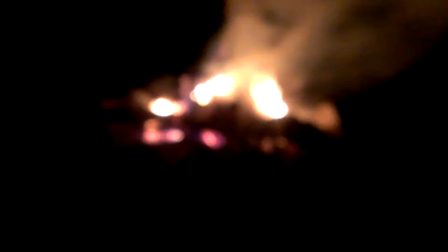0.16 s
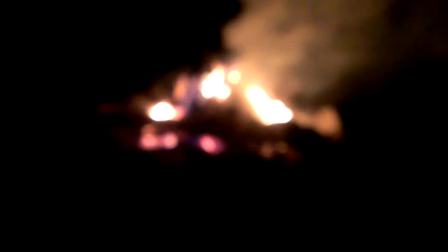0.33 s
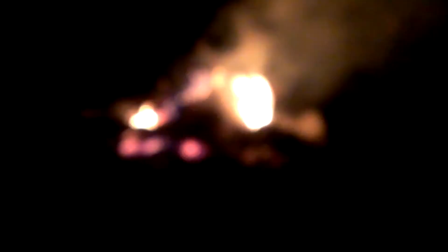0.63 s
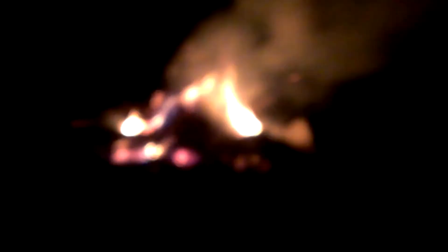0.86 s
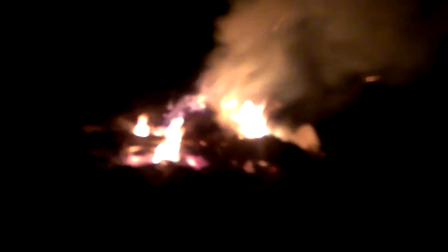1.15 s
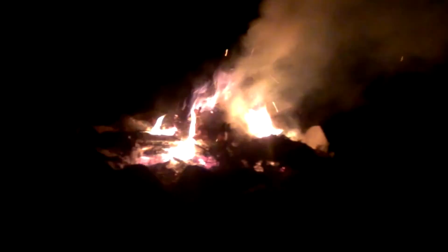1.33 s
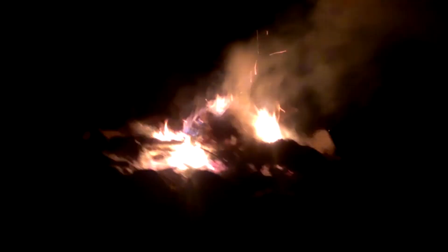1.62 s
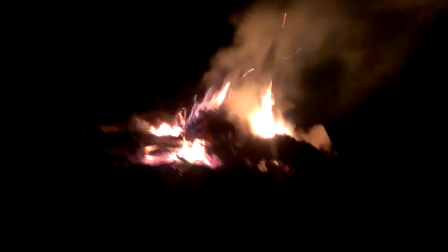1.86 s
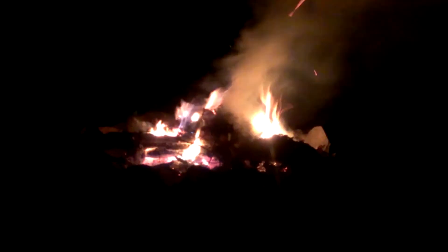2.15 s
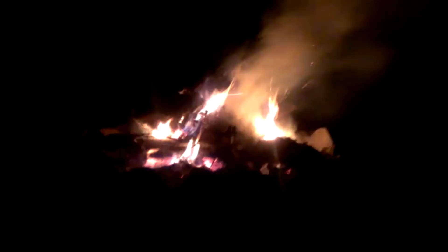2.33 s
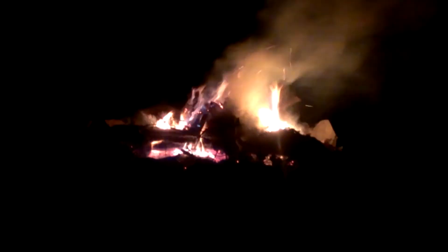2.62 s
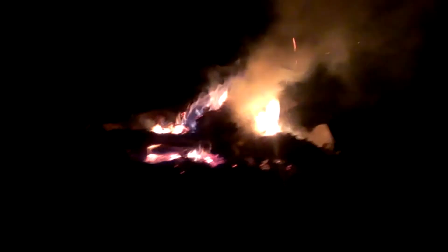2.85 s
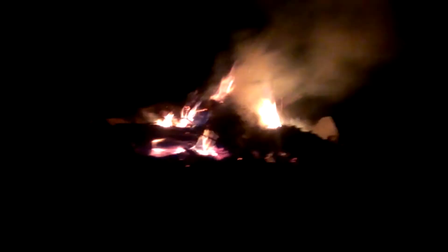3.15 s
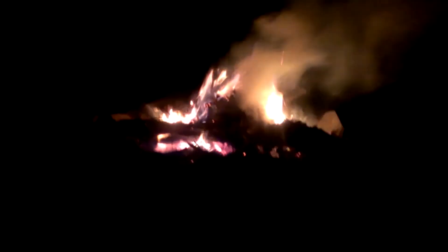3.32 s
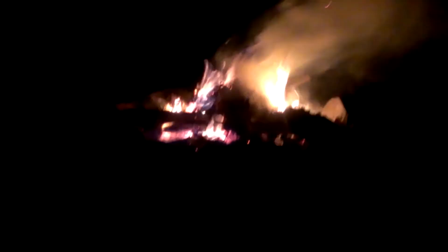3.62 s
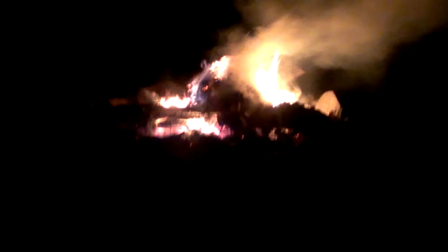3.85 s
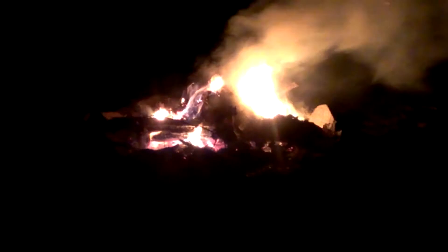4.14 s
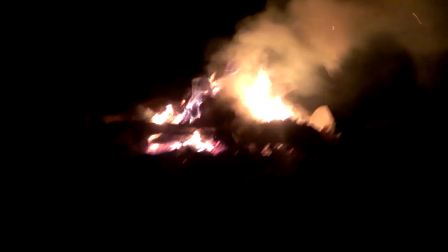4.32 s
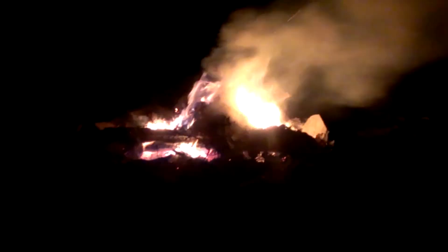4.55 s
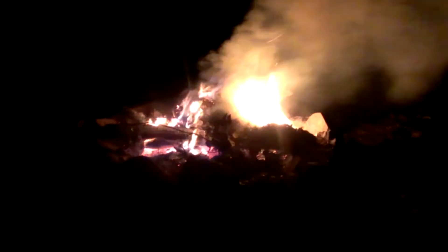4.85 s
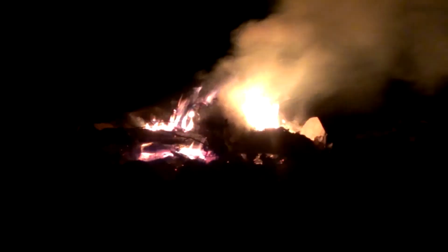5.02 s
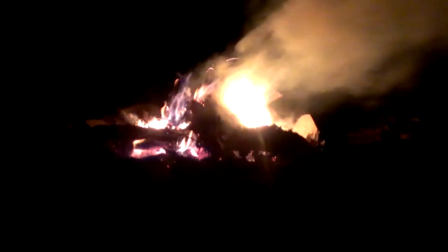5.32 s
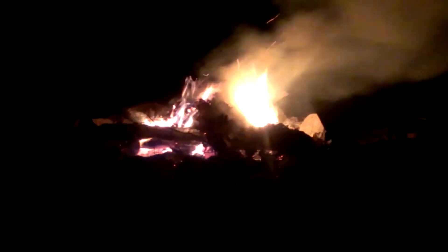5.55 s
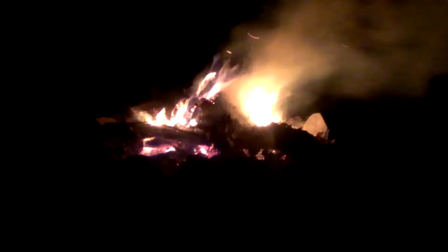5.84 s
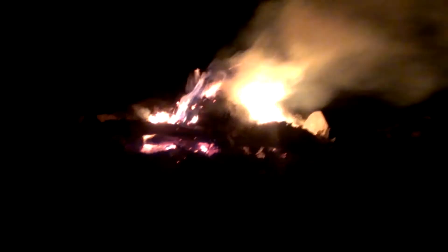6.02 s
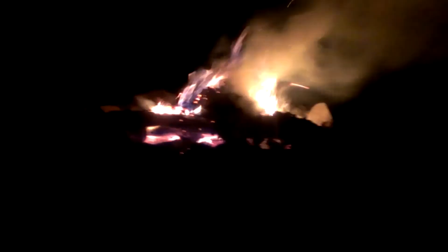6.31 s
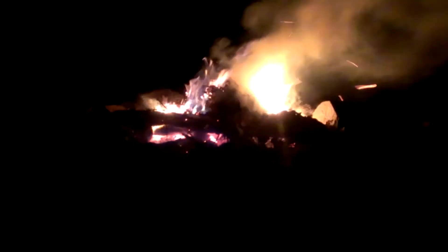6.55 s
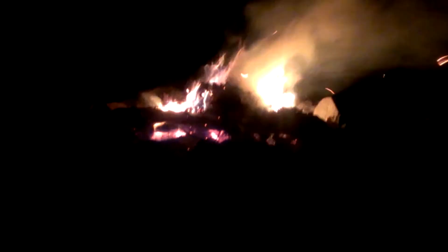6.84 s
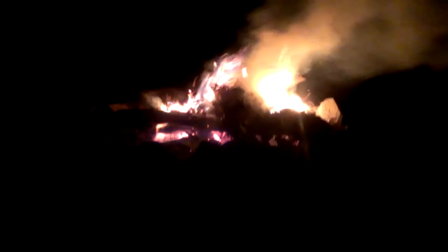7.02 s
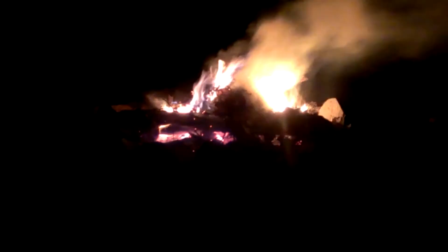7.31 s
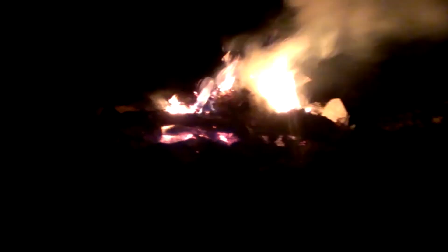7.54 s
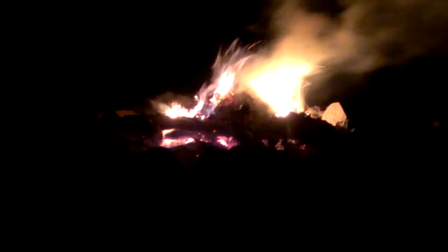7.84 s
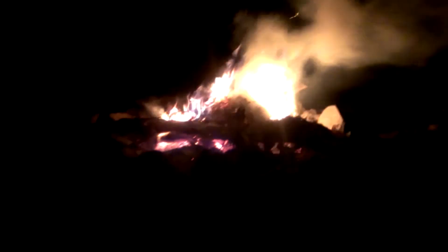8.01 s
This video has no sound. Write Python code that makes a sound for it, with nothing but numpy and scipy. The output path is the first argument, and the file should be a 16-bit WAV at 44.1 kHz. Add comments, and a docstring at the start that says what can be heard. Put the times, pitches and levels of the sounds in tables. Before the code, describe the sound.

A pile of yard waste burns outdoors, with a very faint low roar and steady hiss, constant tiny ticks and irregular sharp, bright snaps across left and right. A few snaps end in short sizzles. Fingers brush and bump the hand-held stereo microphone's casing on the right, with the longest, scratchiest rubbing between about two and a half and four seconds. Later the handling thins out and mostly quiet crackle remains.

```python
"""A faint roar of flames under steady hiss is heard first, with small ticks and the sharp snaps of twigs.
Yard waste burns before a hand-held stereo camera: flames and hiss are shaped noise, snaps are short
resonant noise bursts with a scatter, and sap sizzles as dense clicks that die away.
Fingers brush, slide and knock on the casing near the right microphone: irregular slips drive the
casing modes to rumble and rasp, finer slips scratch, and each knock is a falling swing with a crack."""
import sys
import numpy as np
from scipy import signal
from scipy.io import wavfile
from scipy.ndimage import uniform_filter1d

SR = 44100
rng = np.random.default_rng(int(sys.argv[2]) if len(sys.argv) > 2 else 0)


def materialize(psi):
    """Save the field psi as 16-bit PCM at rate SR to the path in sys.argv[1].

    A 1-D psi becomes a single channel; in a 2-D psi each row is a channel.
    """
    bounded = np.clip(np.atleast_2d(psi).T, -1, 1)
    quanta = np.round(bounded * 32767).astype(np.int16)
    wavfile.write(sys.argv[1], SR, quanta)


N = 360771


def amp(db):
    """Decibel definition: amplitude ratio of a level."""
    return 10 ** (np.asarray(db) / 20)


def evened(x):
    """Normalisation: scales to an rms of 1."""
    return x / np.sqrt(np.mean(x ** 2) + 1e-20)


def read(points, hz):
    """Interpolation of (frequency, value) points along log frequency; the end values hold beyond them."""
    f, value = np.transpose(points)
    return np.interp(np.log(hz + 1), np.log(f + 1), value)


def add(mix, s, sound):
    """Superposition: adds a sound at time s, cut at the end of the mix."""
    part = mix[..., round(s * SR):][..., :sound.shape[-1]]
    part += sound[..., :part.shape[-1]]


def sides(pan_db):
    """Level difference between channels: left and right gains whose mean is 1."""
    left = amp(pan_db)
    return np.array([left, np.ones_like(left)]) * 2 / (1 + left)


def resonate(x, hz, width):
    """Simple resonance: a two-pole filter with a gain of 1 at its peak."""
    quality = max(hz / width, .3)
    b, a = signal.iirpeak(min(hz, .4 * SR), quality, SR)
    return signal.lfilter(b, a, x)


def pair(x, same, colour):
    """Partial coherence: two microphones hear x partly alike; colour(hz, s) gives the spectral gains."""
    other = x * rng.choice([-1., 1.], N)  # same envelope, unrelated waveform
    hz, t, z = signal.stft(np.array([x, other]), SR, nperseg=512, noverlap=384)
    c = np.clip(read(same, hz), -1, 1)[:, None]
    left = c * z[0] + np.sqrt(1 - c ** 2) * z[1]
    z = np.array([left, z[0]]) * colour(hz, t)
    return signal.istft(z, SR, nperseg=512, noverlap=384)[1][:, :N]


# relative spectrum of flames and hiss: (frequency [Hz], density before panning [dB per Hz])
FLAME_SPECTRUM = [(21, -68), (35, -35), (140, 3), (334, -12.5), (454, -8.5), (516, -12.5), (684, -11),
                  (1110, -16.5), (2110, -17), (4800, -19.5), (10900, -19.5), (14800, -20), (16000, -25)]
# coherence of flames and hiss: (frequency [Hz], left-right likeness [-1 to 1])
FLAME_LIKENESS = [(60, 0.396), (180, 0.8), (550, 0.4), (1650, 0.0233), (4970, 0.057), (15000, 0.41)]
# balance of flames and hiss: (frequency [Hz], left minus right [dB])
FLAME_PAN = [(60, -3), (240, -2), (950, -1), (3770, -0.5), (15000, -1)]
FLAME_DB = -64  # rms of both channels together


def flames(patchy_db=1.0, lumpy_db=.7, roar_hz=500):
    """Filtered random noise: hiss with drifting patches; the low roar of the flames flutters."""
    def colour(hz, s):
        """Slow modulation of the spectrum, fading out above roar_hz."""
        frames = len(s)
        patches = uniform_filter1d(rng.standard_normal((len(hz), frames)), size=6, axis=0)
        patches = evened(uniform_filter1d(patches, size=24, axis=1))
        lumps = evened(uniform_filter1d(rng.standard_normal(frames), size=30))
        low = 1 / (1 + (hz[:, None] / roar_hz) ** 2)
        db = read(FLAME_SPECTRUM, hz)[:, None] + (patchy_db * patches + lumpy_db * lumps) * low
        return amp(db) * sides(read(FLAME_PAN, hz))[:, :, None]
    return amp(FLAME_DB) * evened(pair(rng.standard_normal(N), FLAME_LIKENESS, colour))


# resonance of the microphone port: (frequency [Hz], width [Hz], relative level [dB])
PORT = (5710, 530, -6)


def snap(hz, t60, noise, width=0.18, rise_s=0.00081, edge_db=-18.0, lowest=0.56, wood_db=-22.5):
    """Impulsive fracture: a fibre bursts in noise, coloured by its size and the port, with a bright edge."""
    t = np.arange(noise.shape[-1]) / SR
    burst = noise * (1 - np.exp(-(t / rise_s) ** 2)) * amp(-60 * t / max(t60, .002))
    edge = np.diff(burst * amp(-60 * t / 0.021), prepend=0)
    port_hz, port_width, port_db = PORT
    fibre = resonate(burst, hz, width * hz)
    sound = fibre + amp(port_db) * resonate(burst, port_hz, port_width) + amp(edge_db) * edge
    # small things radiate little bass
    bass_cut = signal.butter(6, lowest * hz, "highpass", fs=SR, output="sos")
    sound = signal.sosfilt(bass_cut, sound)
    sound = sound + amp(wood_db) * resonate(burst, 1740.0, 2200.0)  # the body of the twig
    return sound / abs(sound).max()


# snapping twigs: (time [s], peak before panning and scatter [dB], centre [Hz], left minus right [dB])
SNAPS = [(0.2299, -51, 6160, 4), (0.317, -42.5, 5400, -2), (0.3419, -40, 8520, -6),
         (0.3577, -43, 5850, -13), (0.3649, -29, 7760, -9), (0.553, -26, 6360, 0),
         (0.6591, -41, 8330, -8.5), (0.8957, -28.5, 6300, -3), (1.3889, -31, 6100, 9),
         (1.4027, -35.5, 6050, 9.5), (1.5793, -43.5, 5530, -5), (1.659, -52, 5730, -5),
         (2.0226, -37.5, 5660, 8.5), (2.2612, -44, 5950, 10), (2.512, -31, 6270, -5),
         (2.5696, -41, 5890, 7), (2.661, -23.5, 5450, 2), (2.6655, -22.5, 5460, 1.5),
         (3.1095, -26, 6770, -12.5), (3.3657, -20, 5690, 0), (3.8353, -32, 5800, -15),
         (3.8565, -36, 5900, -4), (4.367, -28, 6815, -1), (4.9107, -51, 5030, -1.5),
         (5.0584, -49.5, 8090, -7.5), (5.2195, -40.5, 6300, -3), (5.2309, -46, 6060, -2),
         (5.3838, -32, 5000, 0), (5.3949, -40, 5280, -11), (5.4044, -45.5, 5530, 1.5),
         (5.4114, -42, 6400, -0.5), (5.419, -46, 5400, -5.5), (5.6872, -28.5, 5650, -1),
         (5.9534, -49, 6460, -3.5), (6.0556, -48, 6200, -7), (6.316, -48, 7500, -7.5),
         (6.4744, -43.5, 8340, -3.5), (6.5064, -47.5, 4800, -1), (6.5235, -31.5, 10100, -3.5),
         (6.7321, -46, 6500, -3), (6.8463, -44.5, 7400, -4.5), (7.416, -54, 5000, 0),
         (7.56, -52, 4230, -5.5), (7.5797, -49.5, 4160, -12), (7.7463, -34, 5700, 13),
         (7.8436, -47.5, 4940, -4)]
TICKS_PER_S, TICKS_DB, TICKS_SPREAD_DB = 30., -60.5, 3.5  # small crackle: rate, base level, size scale
SNAP_CYCLES, TICK_CYCLES = 76, 47  # periods of the centre frequency in a 60 dB fall


def twigs(same=0.57, tail_db=-16.0, tail_t60=0.25):
    """Impulses and diffuse scattering: loud snaps, random ticks, a short scatter from ground and pile."""
    out = np.zeros((2, N))
    when, hz, size, pan = rng.random((round(TICKS_PER_S * N / SR), 4)).T
    tick_db = TICKS_DB - TICKS_SPREAD_DB * np.log(size + 0.09)
    ticks = np.transpose([when * N / SR, tick_db, 4000 + 7000 * hz, 8 * pan - 6])
    same = np.clip(same, 0, 1)
    for rows, cycles in [(SNAPS, SNAP_CYCLES), (ticks, TICK_CYCLES)]:
        for s, db, hz, pan_db in rows:
            a, b = rng.standard_normal((2, 1200))
            noise = np.array([a, same * a + np.sqrt(1 - same ** 2) * b])
            add(out, s, amp(db) * sides(pan_db)[:, None] * snap(hz, cycles / hz, noise))
    t = np.arange(6000) / SR
    tail = rng.standard_normal((2, 6000)) * amp(-60 * t / tail_t60) * (t > .003)
    tail /= np.linalg.norm(tail[0])
    return out + amp(tail_db) * signal.oaconvolve(out, tail, axes=1)[:, :N]


# modes of the casing: (frequency [Hz], width of each pass [Hz], relative drive [dB])
CASING = [(143, 120, -8.), (252, 105, 6.5), (457, 190, 6.5), (660, 420, -3), (970, 250, -7.5),
          (1234, 390, -18.5)]


def casing(x, modes=CASING):
    """Modal superposition: each mode twice over, for steep flanks; neighbours swing in opposite sense."""
    total = 0
    for k, (hz, width, db) in enumerate(modes):
        mode = resonate(resonate(x, hz, width), hz, width)
        total = total + (-1) ** k * amp(db) * mode
    return total


def slips(per_s, spread_db):
    """Stick-slip friction: random clicks of uneven size, as skin sticks and lets go."""
    size = amp(spread_db * np.minimum(rng.exponential(1, N), 4)) * rng.standard_normal(N)
    return size * (rng.random(N) < per_s / SR)


def uneven(hz, s, depth_db):
    """Surface roughness: random patches of pitch and time, as skin meets rougher and smoother spots."""
    field = uniform_filter1d(rng.standard_normal((len(hz), len(s))), size=3, axis=0)
    field = uniform_filter1d(field, size=18, axis=1)
    return amp(depth_db * evened(field))


# one long slide of the hand: (time [s], casing rumble [dB], skin scratch [dB]), before panning
SLIDE = [(2.552, -80, -65), (2.574, -56.5, -54.5), (2.628, -56, -40.5), (2.652, -53, -46),
         (2.726, -44.5, -29), (2.788, -54, -27), (2.82, -52, -45), (2.895, -47.5, -54.5), (2.991, -53, -60),
         (3.075, -53, -58), (3.12, -43.5, -48), (3.201, -49, -51.5), (3.243, -54, -62), (3.289, -49, -53),
         (3.35, -50, -55.5), (3.416, -44, -42), (3.489, -40.5, -40.5), (3.592, -43, -35.5),
         (3.63, -45, -41.5), (3.668, -52.5, -54.5), (3.697, -56.5, -55), (3.727, -60.5, -68)]
# short brushes of a finger: (middle [s], rumble [dB], scratch [dB], length [s]), before panning
BRUSHES = [(0.237, -66, -85, 0.099), (.375, -61, -64, 0.11), (0.565, -60, -57, 0.048),
           (0.619, -62.5, -61.5, 0.27), (0.661, -55, -61, 0.082), (0.795, -39, -43, 0.088),
           (0.843, -49, -49.5, 0.046), (0.893, -63, -61, 0.078), (0.982, -70, -67.5, .06),
           (1.117, -57.5, -56.5, 0.077), (1.163, -64.5, -64.5, .05), (1.241, -57.5, -59, 0.049),
           (2.08, -66.5, -68, .12), (2.29, -64.5, -64, 0.17), (2.385, -47.5, -49.5, 0.1),
           (2.445, -51.5, -52.5, 0.11), (3.75, -62, -54, 0.06), (3.81, -60.5, -56.5, 0.11),
           (3.845, -52, -51, 0.085), (3.955, -68.5, -66, 0.18), (4.174, -57.5, -60, 0.078),
           (4.27, -70, -71, 0.098), (4.642, -64.5, -65.5, 0.069), (4.534, -64.5, -80, .03),
           (4.969, -61, -83, 0.022), (5.002, -58.5, -70, .025), (5.28, -66, -67, 0.093),
           (6.863, -59, -66.5, 0.088), (6.957, -55.5, -65, 0.046), (7.013, -65, -65, 0.05),
           (7.725, -63, -80, .054)]
# relative scratch spectrum with its top at SCRATCH_HZ: (frequency [Hz], density [dB per Hz])
SCRATCH = [(1350, -34), (2300, -35), (2610, -35), (3070, -16), (4220, -5.5), (5670, -3.5), (8320, -9.5),
           (9230, -13.5), (15500, -27)]
# coherence of the handling sounds: (frequency [Hz], left-right likeness [-1 to 1])
GRIP_LIKENESS = [(60, 0.27), (180, 0.8), (550, 1), (1650, 0.86), (4970, 0.76), (15000, 0.21)]
# thin casing walls, rung by firm fast sliding: (frequency [Hz], width of each pass [Hz], drive [dB])
RASP = [(1215, 620, 0.5), (1602, 206, 2), (2730, 2900, -1)]
GRIP_PAN_DB = -12  # left minus right
SCRATCH_HZ = 5300
RASP_DB, RASP_FOLLOWS_RUMBLE = -11, 0.32  # relative level; share of rumble rather than scratch (0-1)
# the scratch centre sinks from LIGHT_HZ towards HARD_HZ, halfway at HARD_DB, lagging by LINGER_S
LIGHT_HZ, HARD_HZ, HARD_DB, LINGER_S = 6740, 5240, -50.5, 0.028
BRUSH_EDGE_S = 0.055  # longest swell and fade of a brush; a longer brush holds between
BRUSH_DEEP_DB = -4  # a brushing finger stirs the two deepest modes less than the whole hand does


def grip(flutter_db=2.0, firm_db=-49.0):
    """Friction-driven resonance: slow slips shake the casing, fast ones scratch, duller under pressure."""
    t, power = np.arange(N) / SR, np.zeros((2, N))
    s, *levels = np.transpose(SLIDE)
    inside = (t >= s[0]) & (t < s[-1])
    power[:, inside] = [amp(2 * np.interp(t[inside], s, db)) for db in levels]
    for middle, rumble_db, scratch_db, length in BRUSHES:
        swell = signal.windows.tukey(round(length * SR), min(2 * BRUSH_EDGE_S / length, 1))
        add(power, middle - length / 2, amp(2 * np.array([[rumble_db], [scratch_db]])) * swell)
    gains = np.sqrt(abs(uniform_filter1d(power, size=200)))
    share = np.clip(RASP_FOLLOWS_RUMBLE, 0, 1)
    rasp_gain = amp(RASP_DB) * gains[0] ** share * gains[1] ** (1 - share)
    # the pressure trembles
    tremble = uniform_filter1d(uniform_filter1d(rng.standard_normal(N), size=500), size=500)
    gains[0] *= amp(flutter_db * evened(tremble))

    keep = np.exp(-1 / (LINGER_S * SR))
    recent = signal.lfilter([1 - keep], [1, -keep], power[1])
    centre = LIGHT_HZ + (HARD_HZ - LIGHT_HZ) * recent / (recent + amp(2 * HARD_DB))

    coarse = pair(slips(3000., 1.9), GRIP_LIKENESS, lambda hz, t: uneven(hz, t, depth_db=2.0))
    # a light touch favours the high modes over the deep ones
    firm = np.minimum(gains[0] / amp(firm_db), 1) ** 0.1
    deep = np.where(inside, 1, amp(BRUSH_DEEP_DB)) * firm * casing(coarse, CASING[:2])
    high = 1.22 * casing(coarse, CASING[4:]) / (firm + 0.19)
    rumble = deep + casing(coarse, CASING[2:4]) + high

    def scratch_colour(hz, frame_s):
        """Spectral scaling: the scratch spectrum slides with its moving centre."""
        frame_centre = np.interp(frame_s, t, centre)
        # the last row is left out: the level before it holds, under a fixed treble fall
        spectrum = amp(read(SCRATCH[:-1], hz[:, None] * SCRATCH_HZ / frame_centre))
        treble_fall = 1 + (hz[:, None] / 13200.0) ** 4
        return uneven(hz, frame_s, depth_db=1.5) * spectrum / treble_fall

    fine = slips(15000., 1.96)
    scratch = pair(fine, GRIP_LIKENESS, scratch_colour)
    rasp = casing(pair(fine, GRIP_LIKENESS, lambda hz, t: uneven(hz, t, depth_db=5.0)), RASP)
    handling = gains[0] * evened(rumble) + gains[1] * evened(scratch) + rasp_gain * evened(rasp)
    return sides(GRIP_PAN_DB)[:, None] * handling


# sap sizzles out after a snap: (start [s], initial rms before panning [dB], t60 [s], centre [Hz])
SIZZLES = [(0.364, -60, 0.17, 7900), (2.024, -66.5, .215, 6500), (4.368, -58, 0.44, 6860),
           (5.384, -51, 0.24, 8500), (5.689, -63, 0.21, 7000), (6.47, -66.5, 1, 2300),
           (7.743, -62, .195, 6000)]
SIZZLE_PAN_DB = -1.5  # left minus right


def sizzles(width=1.0):
    """Band-limited shot noise with exponential decay: spitting steam that dies away."""
    spit = np.array([slips(8200.0, 1.8), slips(9000., 2.7)])
    shared = spit + .6 * spit[::-1]  # each side also hears the other's clicks
    out, t = np.zeros((2, N)), np.arange(SR // 2) / SR
    for s, db, t60, hz in SIZZLES:
        part = shared[:, round(s * SR):][:, :len(t)]
        part = evened(resonate(resonate(part, hz, width * hz), hz, 2 * width * hz))
        decay = amp(db - 60 * t[:part.shape[1]] / t60)
        add(out, s, sides(SIZZLE_PAN_DB)[:, None] * decay * part)
    return out


# finger knocks: (time [s], peak before panning and bass cut [dB], lowest ring [Hz], nail crack [dB])
# the nail crack is relative to the rocking
KNOCKS = [(.5570, -31.5, 146, -42), (0.8499, -26.5, 259, -25), (1.0364, -48.5, 390, -3),
          (1.8490, -44, 150, -33), (1.9418, -49.5, 307, -28), (2.74, -37.5, 114, -40),
          (2.892, -40, 461, -40), (3.584, -31.5, 124, -30), (4.3650, -49.5, 364, -14),
          (6.4330, -28, 395, 13)]
# modes under a hard tap: (frequency [Hz], width setting the decay [Hz], relative level [dB])
NAIL = [(880, 1600, 4), (1560, 580, -5.5), (2830, 970, 1), (4120, 210, -10), (5700, 1400, 4.5)]
KNOCK_CYCLES = 7.4  # periods of the lowest ring in a 60 dB fall


def knocks(start_hz=765.0, fall_s=0.0013, modes_db=-15.0):
    """Impact excitation: a tight high swing slows to the rocking of the whole camera and rings the casing."""
    out, t = np.zeros(N), np.arange(4000) / SR
    rung = casing(np.exp(-t / 0.00019))
    crack = 0
    for hz, width, db in NAIL:
        crack = crack + amp(db - 60 * t * width / 2.8) * np.sin(2 * np.pi * hz * t)
    crack = crack * (1 - np.exp(-t / 0.00059))
    for s, db, hz, crack_db in KNOCKS:
        turns = hz * t + (start_hz - hz) * fall_s * (1 - np.exp(-t / fall_s))
        envelope = amp(-60 * t * hz / KNOCK_CYCLES) * (1 - np.exp(-t / 0.0004))
        rock = -np.sin(2 * np.pi * turns) * envelope
        sound = rock + amp(modes_db) * rung / abs(rung).max() + amp(crack_db) * crack
        add(out, s, amp(db) * sound / abs(sound).max())
    return sides(GRIP_PAN_DB)[:, None] * out


LOW_CUT_HZ = 90  # microphone bass roll-off, applied to the handling sounds


def scene():
    """Superposition of the fire and the handling sounds, the latter through the bass roll-off."""
    bass_cut = signal.butter(2, LOW_CUT_HZ, "highpass", fs=SR, output="sos")
    near = signal.sosfilt(bass_cut, grip() + knocks())
    return flames() + twigs() + near + sizzles()


EDGE_HZ, OFFSET = 16000, -.0005  # band limit, steady offset of the converter (full scale 1)


def record(dry):
    """Linear filtering: the converter offset, then the band limit."""
    low_pass = signal.firwin(511, EDGE_HZ, window=("kaiser", 9), fs=SR)
    return signal.oaconvolve(dry + OFFSET, low_pass[None], "same")


dry = scene()
out = record(dry)
materialize(out)
```